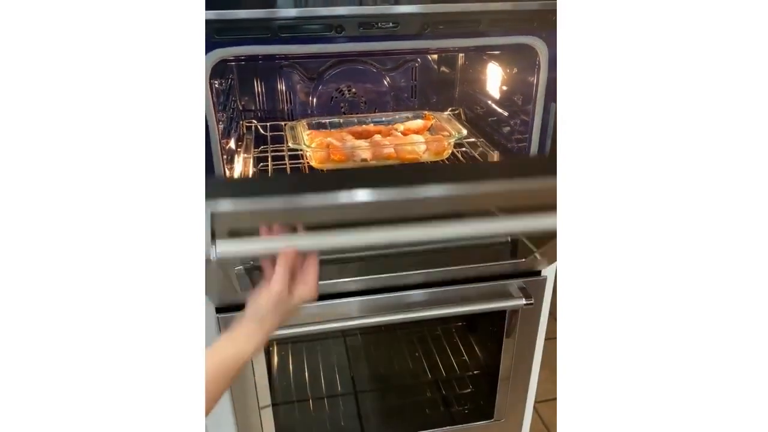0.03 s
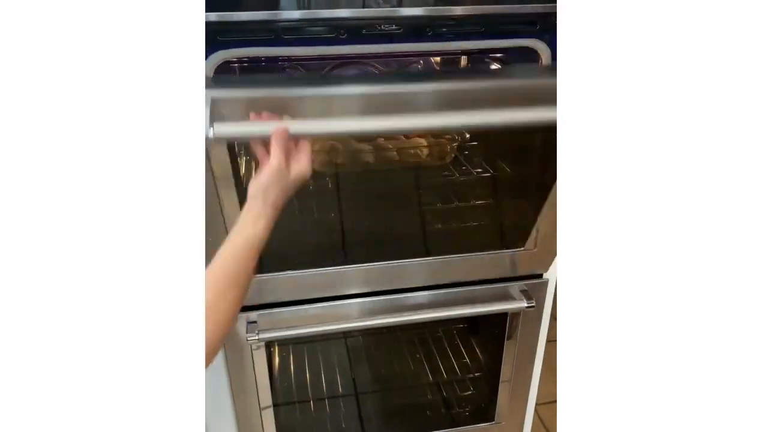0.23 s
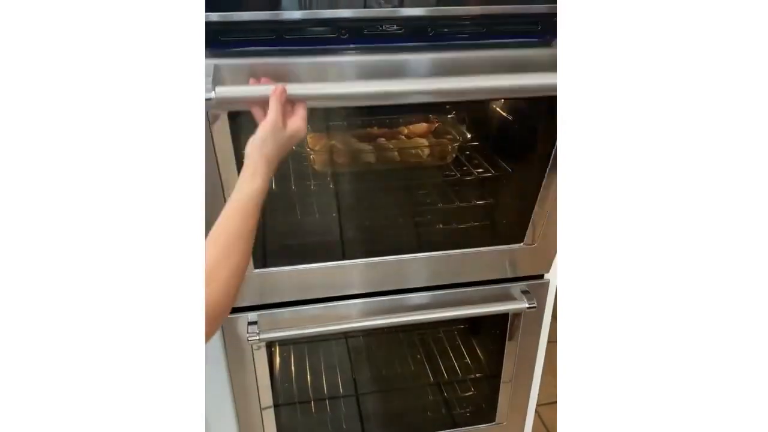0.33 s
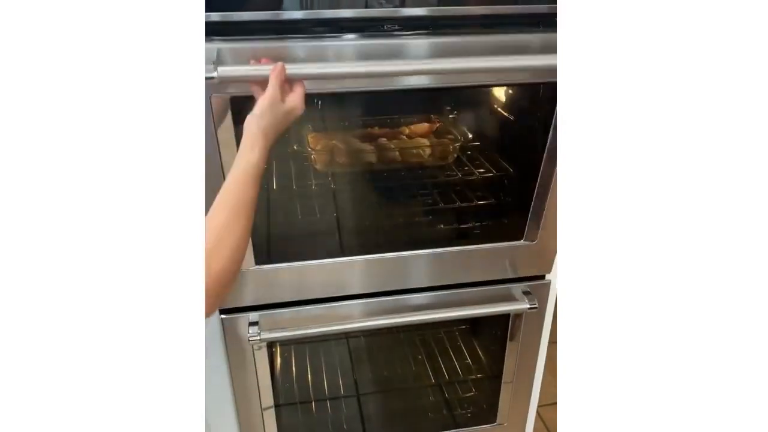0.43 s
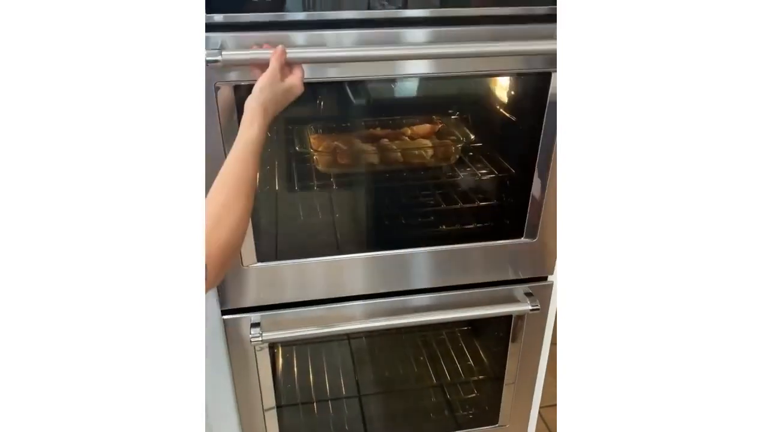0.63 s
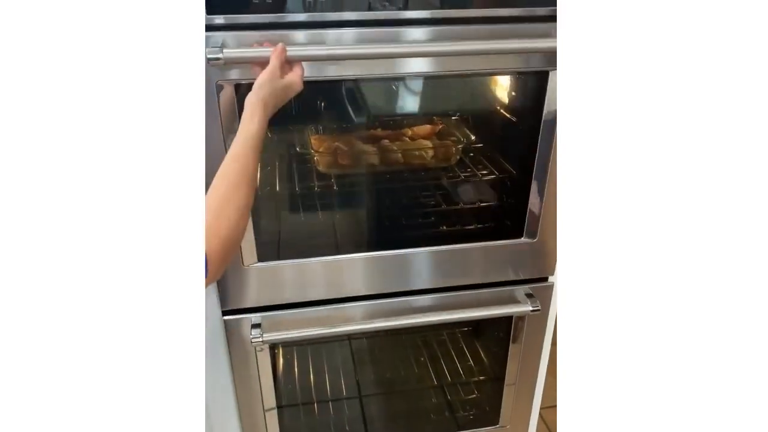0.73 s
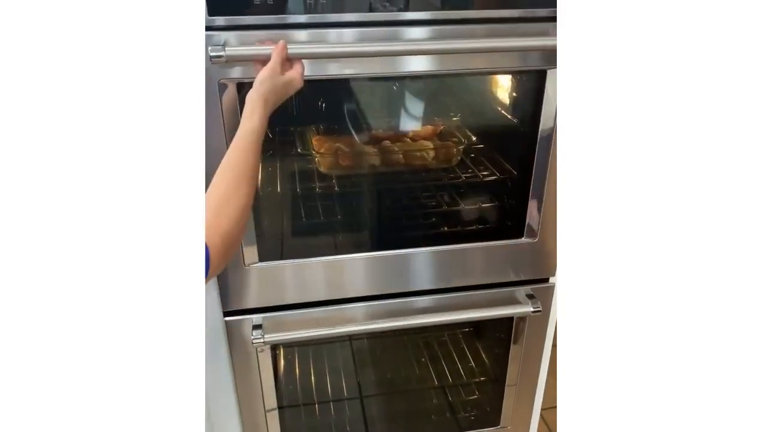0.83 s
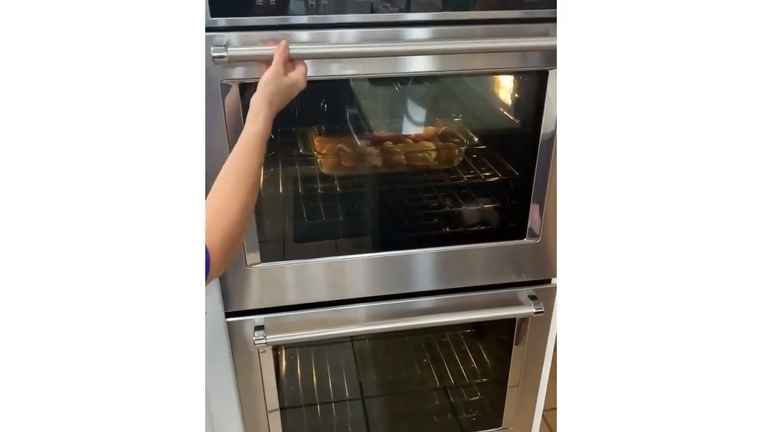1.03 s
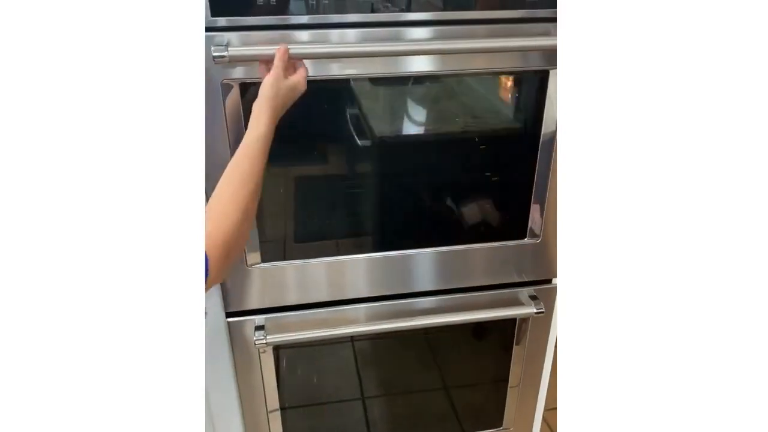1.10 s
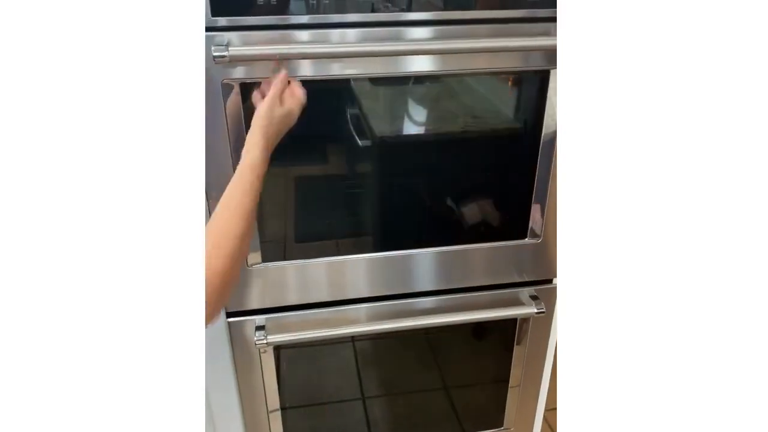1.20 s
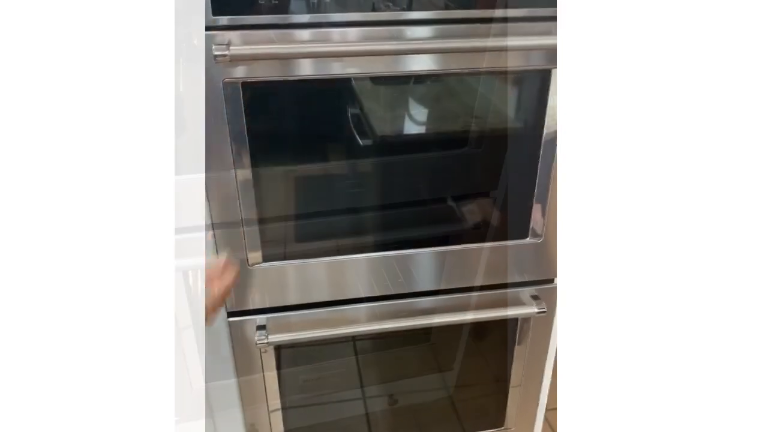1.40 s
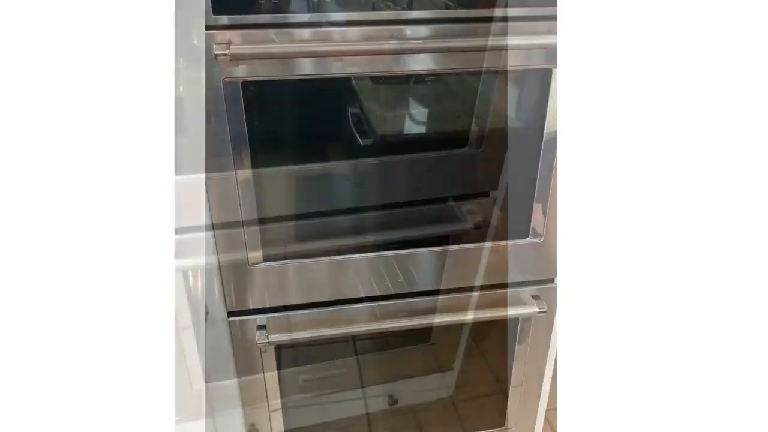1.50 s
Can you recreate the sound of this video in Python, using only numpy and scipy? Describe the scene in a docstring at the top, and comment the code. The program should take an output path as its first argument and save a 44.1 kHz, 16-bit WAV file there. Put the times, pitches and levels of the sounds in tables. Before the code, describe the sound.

A heavy steel oven door slams shut, rattles and settles, then a hand rustles faintly.

```python
"""Oven door slam

A heavy oven door slams shut in a kitchen: steel cracks on the frame, the panels thump, rattle and ring.
The door rebounds and lands again with a duller knock, then settles while the oven cavity booms softly.
A hand and clothing rustle and brush near the handle, over a low steady rumble and the oven's hum."""
import sys
import numpy as np
from scipy import signal
from scipy.fft import rfft, irfft
from scipy.io import wavfile
from scipy.ndimage import uniform_filter1d

SR = 44100
rng = np.random.default_rng(int(sys.argv[2]) if len(sys.argv) > 2 else 0)


def digitize_waveform(pressure):
    """Quantize a signal to 16-bit integers and store it at the path in sys.argv[1].

    Rows of a 2-D input are taken as channels; values are limited to [-1, 1].
    """
    field = np.atleast_2d(pressure).T
    bounded = np.clip(field, -1, 1)
    quanta = np.round(bounded * 32767).astype(np.int16)
    wavfile.write(sys.argv[1], SR, quanta)


N = 68355
TIME = np.arange(N) / SR


# The edge meets the frame in quick steps. Each row: start in seconds, level in dB, t60 in seconds.
FRAME_CONTACTS = [(0.2055, -24, 0.022), (0.2074, -15, 0.015), (0.2073, -25, 0.0078), (0.2122, -19, 0.0064),
                  (0.2167, -21, 0.0084)]
# The bright tone of steel on steel. Each row: frequency in Hz, relative level in dB.
CRACK_COLOUR = [(60, -30), (150, -6), (500, -3), (900, -5.5), (1500, -11), (2000, -7.5), (2700, 3.5),
                (3300, -19), (4200, -2), (5300, -27), (7500, -5.5), (10500, -11), (15000, -16)]
# The tone of the panels and kitchen ringing on. Each row: frequency in Hz, relative level in dB.
RING_COLOUR = [(60, -45), (100, -13.5), (150, -11.5), (230, -29), (275, -11), (400, -8.5), (600, -8),
               (900, -19.5), (1300, -14.5), (2000, -16.5), (2700, -15), (3100, -28), (4200, -22.5),
               (5300, -31), (7200, -24.5), (10000, -30.5), (15000, -40)]

def slam():
    """The door hits the frame: a bright crack of several contacts, then steel and room ring."""
    out = np.zeros((2, N))
    for start, db, t60_s in FRAME_CONTACTS:
        add(out, start, amp(db) * burst(CRACK_COLOUR, rise_s=0.000099, t60_s=t60_s))
    ring = amp(-25.5) * ring_tail(RING_COLOUR) + amp(-30.5) * steel_modes(high_hz=9000)
    add(out, start_s=0.2066, sound=ring)
    return out


# The clear notes of the door. Each row: pitch in Hz, relative level in dB, t60 in seconds.
STEEL_MODES = [(146.1, -4, 0.45), (196.1, -9.5, 0.76), (230.85, -7, 0.76), (383.7, -5.5, 0.66),
               (462.3, -5, 0.53), (548.3, -9, .7), (591.2, 1.5, 0.18), (676, -2.5, 0.37), (871, -8, 0.15),
               (915, -18, 0.3), (1053, -6.5, 0.36), (1108, -21, 0.91), (1310, -14, 0.59), (1509, -19, 0.66),
               (1713, -3.5, 0.33), (1838, -7, 0.4), (1855, -8.5, 0.61), (1911, -9.5, .35),
               (2243, -11, 0.48), (2498, -4, 0.2), (2522, -2, 0.28), (2750, 0.5, 0.14), (2850, -3, .11),
               (3510, -5.5, 0.27), (4210, -12.5, .3), (4608, -5, .14), (7590, -8.5, 0.15)]

def steel_modes(high_hz):
    """Each mode beats against a weaker twin; a softer blow rolls off those above high_hz."""
    split_hz, twin_db, rise_cycles = 14, -4, 6.5
    out, t = np.zeros((2, N)), TIME[:SR]
    for hz, db, t60_s in STEEL_MODES:
        pair_hz = np.array([[hz], [hz + split_hz * rng.uniform(-1, 1)]])
        main, twin = np.exp(2j * np.pi * (pair_hz * t + rng.random((2, 1))))
        stereo_phase = np.exp(1j * 0.098 * hz / 1000 * rng.standard_normal((2, 1)))
        attack = np.minimum(hz * t / rise_cycles, 1)  # high modes speak at once, low ones build up
        level = attack * amp(db - 60 * t / t60_s) / np.hypot(1, (hz / high_hz) ** 2)
        out[:, :SR] += level * (stereo_phase * (main + amp(twin_db) * twin)).imag
    return out


# How long the door and kitchen ring. Each row: frequency in Hz, t60 in seconds.
RING_DECAY = [(150, 1), (450, 0.68), (1000, 0.66), (2400, 0.56), (5000, 0.59), (10000, 0.36)]

def ring_tail(colour):
    """Diffuse ringing that builds, holds briefly and dies faster in the treble; loose panels rattle it."""
    rise_s, hold_s = 0.008, 0.018
    hz, t, bands = signal.stft(panel_resonances(noise(colour)), SR, nperseg=512)
    decay = amp(-60 * np.maximum(t - hold_s, 0) / curve_at(RING_DECAY, hz)[:, None])
    ring = signal.istft(bands * decay, SR, nperseg=512)[1][:, :N]
    rattle = flutter(depth_db=1.07, lump_s=0.0081)
    return ring * np.minimum(TIME / rise_s, 1) * rattle


def panel_resonances(x):
    """Crowded panel resonances put random peaks and dips in the tone, fewer dB deep in the bass."""
    depth_db, spacing_hz, knee_hz = 3, 70.1, 390
    hz = np.fft.rfftfreq(N, 1 / SR)
    peaks = np.clip(rng.standard_normal(1500), -2, 2)
    ripple = np.interp(hz / spacing_hz, np.arange(len(peaks)), peaks)
    return unit(irfft(rfft(x) * amp(depth_db * ripple * hz / (hz + knee_hz)), N))


# Rattles and knocks after the slam. Each row: start in seconds, level in dB, low and high band edges
# in Hz, t60 in seconds, tail level in dB relative to the knock.
REBOUND_KNOCKS = [(.2425, -24, 400, 1400, 0.055, -20), (0.2668, -26, 350, 1870, 0.044, -15.5),
                  (.276, -22, 326, 750, 0.051, -15.5), (.4733, -24.5, 258, 970, 0.094, -12),
                  (.544, -46, 596, 1240, 0.029, -8), (.718, -43, 765, 1345, 0.18, -6),
                  (1.218, -41, 200, 704, 0.038, -13)]

def rebounds():
    """The door rebounds and settles: cushioned blows, each confined to a band, with a weaker ring."""
    out = np.zeros((2, N))
    hz = np.geomspace(20, 20000, 60)
    for start, db, low_hz, high_hz, t60_s, tail_db in REBOUND_KNOCKS:
        band = 1 / np.hypot(1, (low_hz / hz) ** 2) / np.hypot(1, (hz / high_hz) ** 2.6)
        colour = np.column_stack([hz, 20 * np.log10(band)])
        ring = amp(tail_db) * ring_tail(colour) + amp(-13) * steel_modes(high_hz)
        blow = burst(colour, rise_s=0.0004, t60_s=t60_s)
        add(out, start, amp(db) * (blow + ring))
    return out


# Thumps and pings. Each row: start in seconds, pitch in Hz, peak in dB before panning, seconds to peak.
PANEL_FLEXES = [(.2066, 2370, -8, 0.00059), (.2076, 4120, -21.5, 0.0007), (.2065, 871, -23, 0.013),
                (0.2068, 1095, -23, .0035), (.2125, 458, -12, 0.0081), (.207, 605, -24, 0.0079),
                (0.216, 176.4, -33.5, 0.016), (0.234, 4190, -38, .012), (.24, 490, -23.5, 0.0058),
                (.268, 447, -23.5, 0.0074), (.272, 576, -22, 0.0073), (0.263, 191, -26, 0.011),
                (.312, 231.8, -32, .028), (0.4725, 2090, -27, 0.0006), (0.4733, 1020, -23, 0.0018),
                (.4735, 877, -29.5, 0.0083), (.475, 563, -28, 0.01), (.476, 307, -30, 0.012),
                (.48, 190, -25.5, 0.016), (0.551, 188, -35.5, 0.017), (.715, 847, -37, 0.0062),
                (1.217, 840, -46, 0.0083), (1.218, 442, -45.5, 0.008), (1.22, 216, -43.5, 0.011)]

def flexing_panels():
    """Steel parts swell and ring briefly after a blow: lows in the centre, the rest a little right."""
    mono_below_hz, pan = 260, amp([[-1.5], [1.5]])
    out = np.zeros((2, N))
    for start, hz, db, peak_s in PANEL_FLEXES:
        add(out, start, (pan if hz > mono_below_hz else 1) * damped_mode(hz, db, peak_s))
    return out


# Soft, deep booms. Each row: start in seconds, pitch in Hz, peak in dB, seconds to peak.
CAVITY_BOOMS = [(0.267, 89.2, -38.5, 0.05), (0.334, 62.6, -34.5, 0.052), (0.487, 76.6, -36.5, 0.023),
                (0.945, 60.5, -36.5, 0.041), (1.155, 53, -46, 0.044)]

def oven_cavity():
    """The hollow of the oven booms as the door settles."""
    out = np.zeros((2, N))
    for start, hz, db, peak_s in CAVITY_BOOMS:
        add(out, start, damped_mode(hz, db, peak_s))
    return out


# The airy tone of skin and cloth. Each row: frequency in Hz, relative level in dB.
RUSTLE_COLOUR = [(800, -15), (1500, 2), (3000, -7), (5000, -10.5), (7000, 0), (10000, -2.5), (13000, -2),
                 (15500, -8.5)]
# The rustle's fader. Each row: time in seconds, level in dB.
RUSTLE_FADER = [(0, -76), (.42, -61.5), (.55, -56), (.62, -43), (.69, -51.5), (.77, -46.5), (.87, -48.5),
                (.96, -51.5), (1.02, -51.5), (1.1, -52), (1.2, -70.5), (1.27, -61), (1.33, -62),
                (1.42, -82.5), (1.55, -81)]

def rustle():
    """Patchy hiss, with clicks of uneven size where skin and cloth catch."""
    snags_per_s, spread_db = 3300, 3
    hiss = patchy(noise(RUSTLE_COLOUR), depth_db=5, patch_hz=500, patch_s=0.035)
    sizes = amp(spread_db * np.minimum(rng.exponential(1, N), 4)) * rng.choice([-1, 1], N)
    clicks = sizes * (rng.random(N) < snags_per_s / SR)
    tone = amp(curve_at(RUSTLE_COLOUR, np.fft.rfftfreq(N, 1 / SR)))
    snags = unit(irfft(rfft(clicks) * tone, N))
    return unit(hiss + amp(-8) * snags) * fader(RUSTLE_FADER)


# The dull tone of a hand on the handle. Each row: frequency in Hz, relative level in dB.
RUB_COLOUR = [(25, -24), (45, 13), (65, 15), (110, 0), (200, 5.5), (330, -1), (550, 1.5), (1100, -2),
              (2000, -7.5), (4000, -13), (9000, -27)]
# The rub's fader. Each row: time in seconds, level in dB.
RUB_FADER = [(0, -63.5), (.5, -50.5), (.62, -47.5), (.7, -48.5), (.85, -47.5), (.97, -44), (1.1, -49),
             (1.2, -54), (1.32, -58.5), (1.42, -60), (1.55, -63.5)]
# The tone of the brush. Each row: frequency in Hz, relative level in dB.
BRUSH_COLOUR = [(150, -22), (400, -2), (700, -5), (1200, 3), (2700, -10), (4200, -10.5), (6000, -5),
                (10000, -11.5), (15500, -18)]

def hand():
    """Friction at the handle: high rustle, duller rubbing and one sharp brush, all slightly grainy."""
    grain = flutter(depth_db=0.56, lump_s=0.008)
    out = rustle() + noise(RUB_COLOUR) * fader(RUB_FADER)
    brush = amp(-33.5) * burst(BRUSH_COLOUR, rise_s=0.0036, t60_s=0.3)
    add(out, start_s=0.882, sound=brush)
    return out * grain


# The oven's steady hum. Each row: pitch in Hz, rms level in dB.
OVEN_HUM = [(60, -58), (585, -67.5)]
# The room tone. Each row: frequency in Hz, relative level in dB.
RUMBLE_COLOUR = [(20, -35), (40, -29), (60, -0.5), (95, -12.5), (140, -9.5), (210, -16), (300, -19.5),
                 (420, -25), (580, -19.5), (750, -37), (1200, -43.5), (2300, -63.5), (5000, -49.5),
                 (7500, -44), (15000, -94.5)]

def kitchen():
    """The background bed: the oven hums over a low rumble."""
    hum = sum(amp(db) * np.sqrt(2) * np.sin(2 * np.pi * (hz * TIME + rng.random()))
              for hz, db in OVEN_HUM)
    return hum + amp(-51) * noise(RUMBLE_COLOUR)


# The stereo spread of all the noise. Each row: frequency in Hz, side level relative to mid in dB.
STEREO_WIDTH = [(60, -24), (150, -18), (380, -7.5), (950, -7.5), (2400, -1.5), (5500, 4.5), (9000, -7.5),
                (15000, -9.5)]

def noise(colour):
    """Stereo noise of rms 1 in the given colour, narrow in the bass and widest in the lower treble."""
    hz = np.fft.rfftfreq(N, 1 / SR)
    mid, side = np.exp(2j * np.pi * rng.random((2, len(hz)))) * amp(curve_at(colour, hz))
    side = side * amp(curve_at(STEREO_WIDTH, hz))
    return unit(irfft(np.array([mid + side, mid - side]), N))


def burst(colour, rise_s, t60_s):
    """Dense, quickly damped modes set off by one blow of a set strength."""
    envelope = np.minimum(TIME / rise_s, 1) * amp(-60 * TIME / t60_s)
    return unit(noise(colour) * envelope) * np.sqrt(np.mean(envelope ** 2))


def damped_mode(hz, db, peak_s):
    """One heavily damped mode that swells and dies within a few cycles."""
    age = TIME / peak_s
    swell = (age * np.exp(1 - age)) ** 3.62
    return amp(db) * swell * np.sin(2 * np.pi * hz * TIME)


def flutter(depth_db, lump_s):
    """A gain of rms 1 that wavers in random lumps."""
    wobble = uniform_filter1d(rng.standard_normal(N), round(lump_s * SR))
    return unit(amp(depth_db * unit(wobble)))


def patchy(x, depth_db, patch_hz, patch_s):
    """Lets patches of the spectrum swell and fade at random."""
    bands = signal.stft(x, SR, nperseg=256)[2]
    patches = rng.standard_normal(bands.shape[:0:-1])  # time by frequency
    patches = uniform_filter1d(patches, round(patch_s * SR / 128), axis=0)
    patches = uniform_filter1d(patches, round(patch_hz * 256 / SR), axis=1)
    gain = amp(depth_db * unit(patches).T)
    return unit(signal.istft(bands * gain, SR, nperseg=256)[1][:, :N])


def amp(db):
    """Decibels to gain."""
    return 10 ** (np.asarray(db) / 20)


def unit(x):
    """Scales to rms 1."""
    return x / np.sqrt(np.mean(x ** 2) + 1e-20)


def curve_at(points, hz):
    """Reads a table along a log-frequency axis."""
    point_hz, values = np.transpose(points)
    return np.interp(np.log(hz + 1), np.log(point_hz + 1), values)


def fader(points):
    """A gain that rides through (seconds, dB) points."""
    return amp(np.interp(TIME, *np.transpose(points)))


def add(mix, start_s, sound):
    """Drops a sound into the mix at start_s."""
    part = mix[:, round(start_s * SR):]
    part += sound[..., :part.shape[1]]


def scene():
    """Door and hand over the sound of the kitchen."""
    door = slam() + rebounds() + flexing_panels() + oven_cavity()
    return door + hand() + kitchen()


def record(dry):
    """A steep high cut at 15.8 kHz."""
    high_cut = signal.firwin(511, 15800, window=("kaiser", 9), fs=SR)
    return signal.oaconvolve(dry, high_cut[None], "same")


dry = scene()
out = record(dry)
digitize_waveform(out)
```